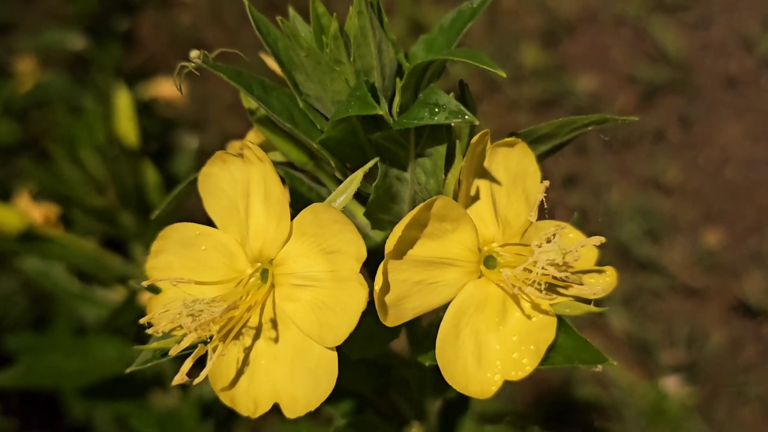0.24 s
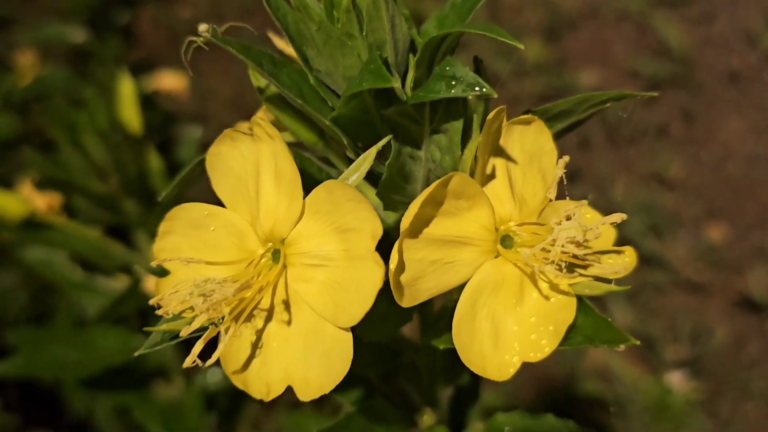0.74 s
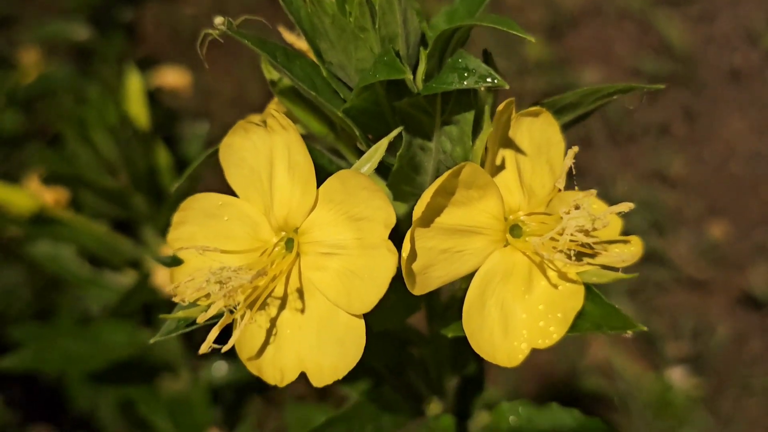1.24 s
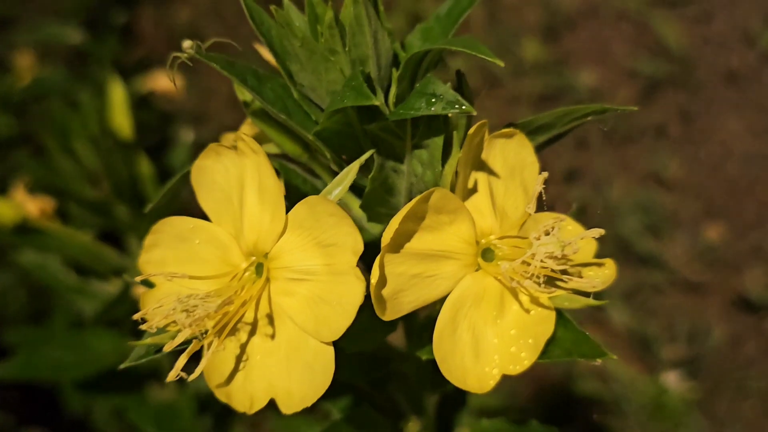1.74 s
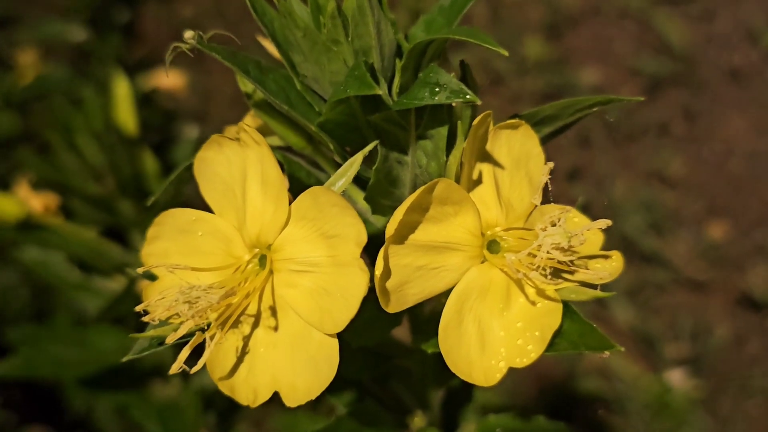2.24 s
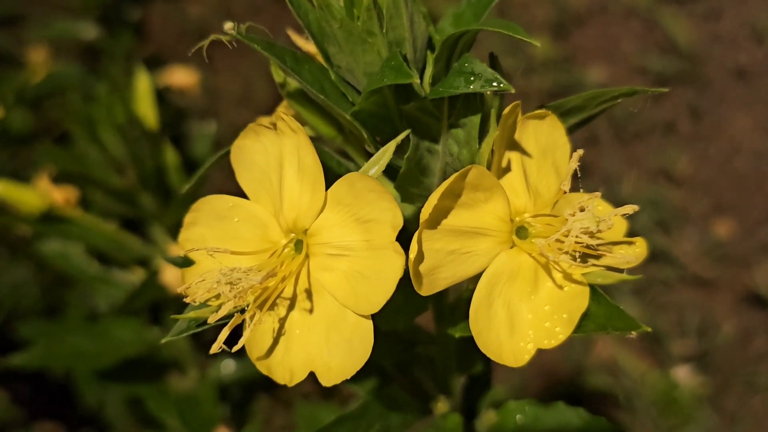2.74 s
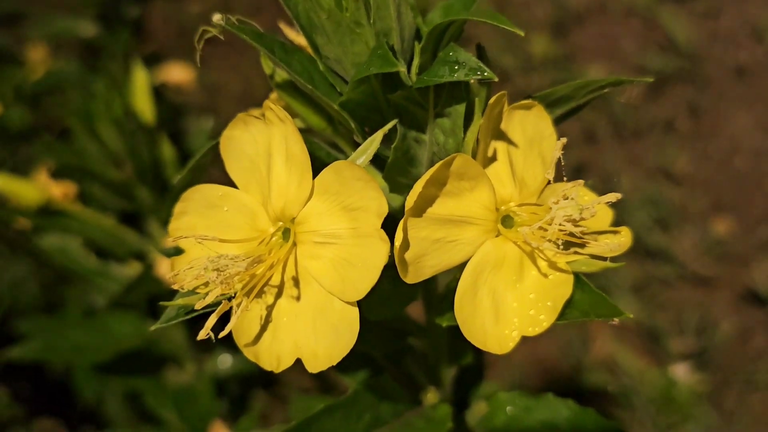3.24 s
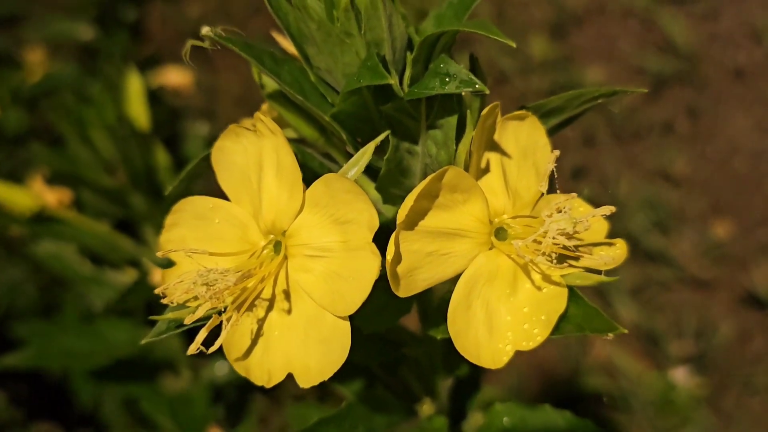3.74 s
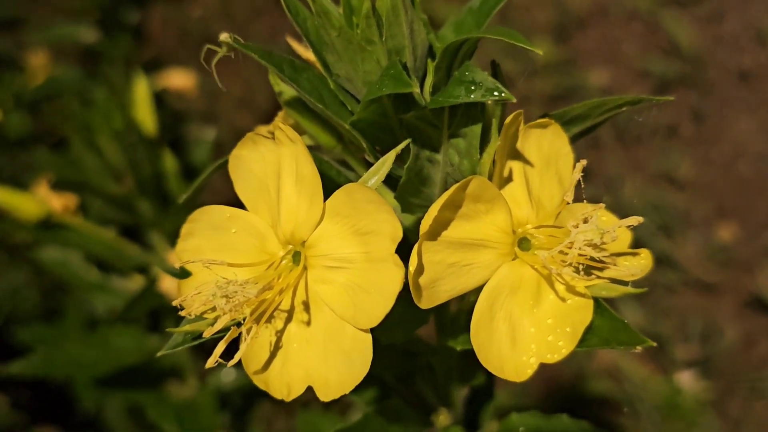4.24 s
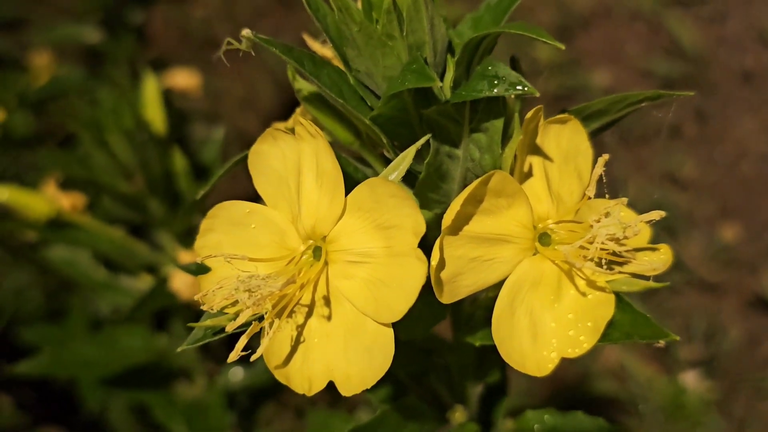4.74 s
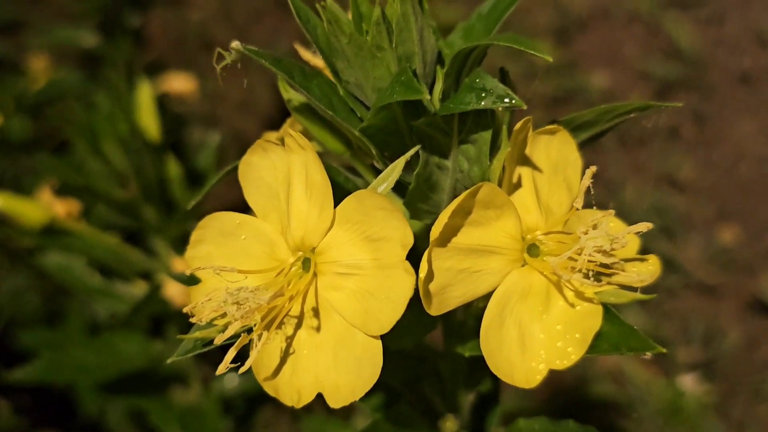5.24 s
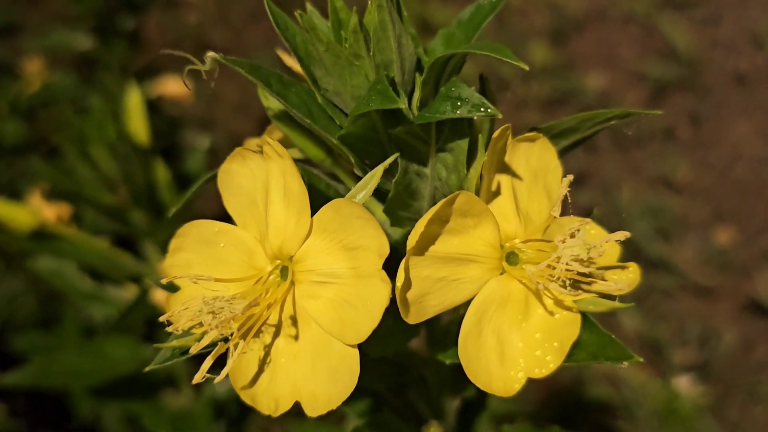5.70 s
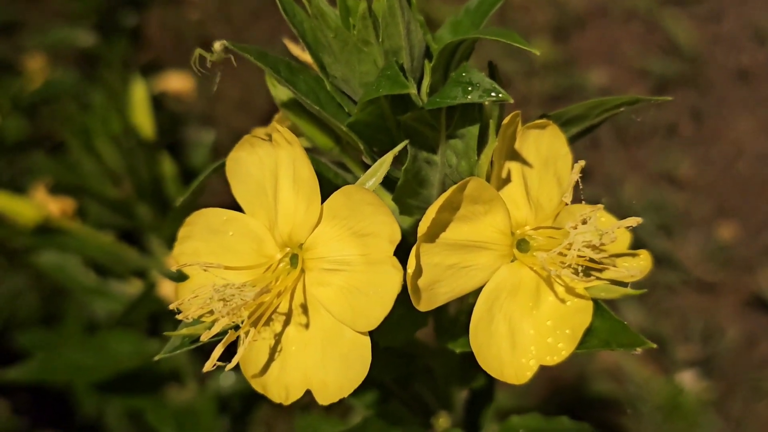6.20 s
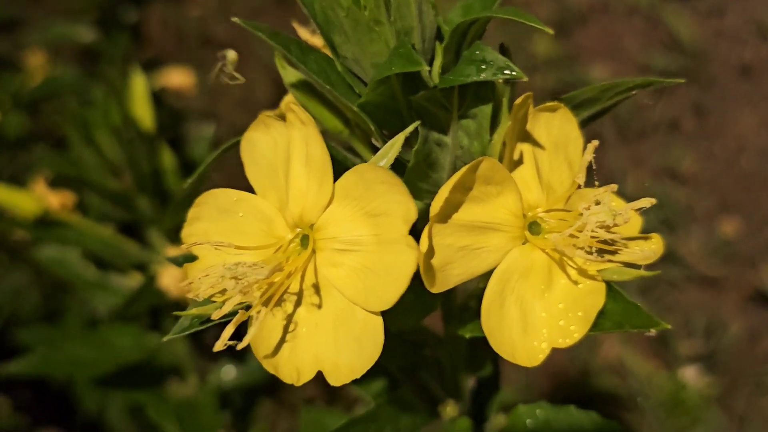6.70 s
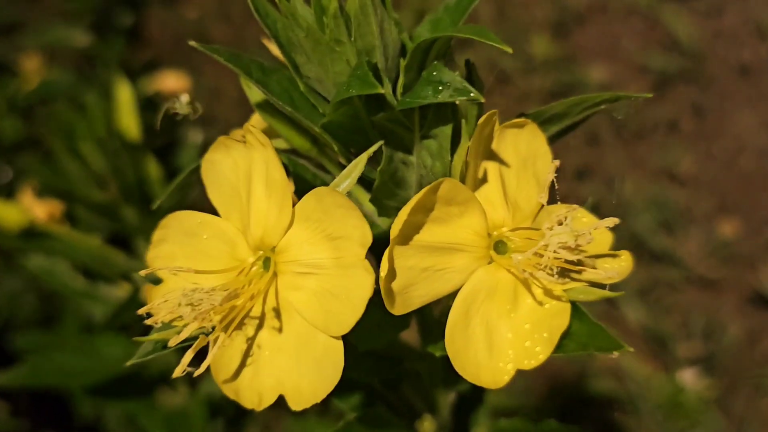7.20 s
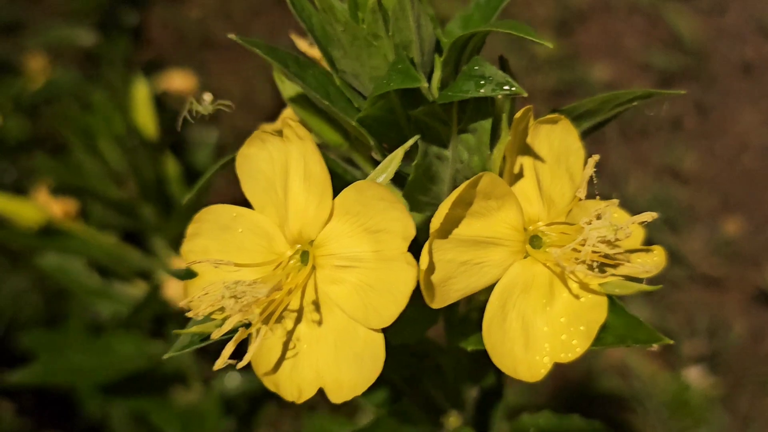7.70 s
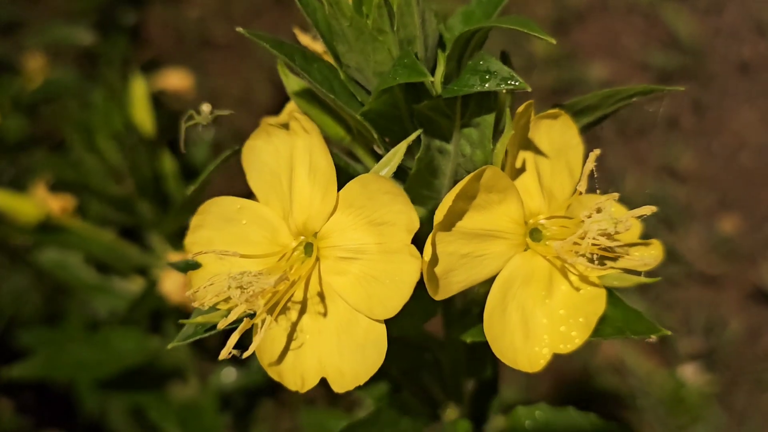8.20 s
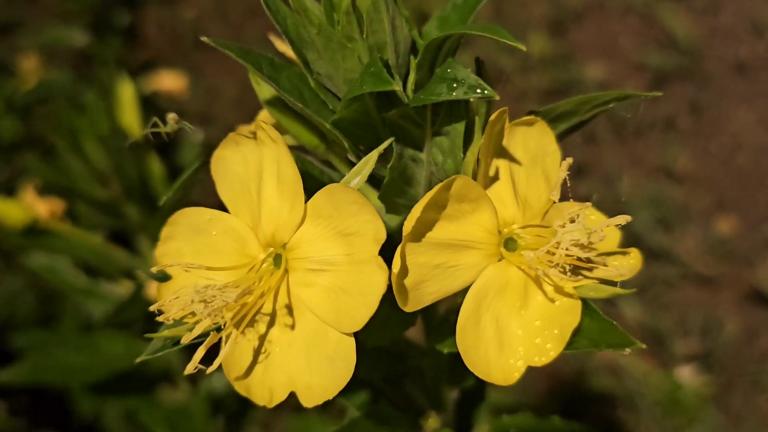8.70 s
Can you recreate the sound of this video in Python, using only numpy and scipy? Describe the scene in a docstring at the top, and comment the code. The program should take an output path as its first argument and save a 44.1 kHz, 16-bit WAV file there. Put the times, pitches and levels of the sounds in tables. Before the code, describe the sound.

Crickets trill in high, even pulses in open countryside at night, over a low distant traffic rumble and light wind.

```python
"""Open countryside at night. Distant traffic rumbles and light wind stirs the two microphone ports.
Crickets sing by stridulation: a scraper on one wing crosses a file on the other and drives a resonance.
Tree crickets trill in chorus near 3 kHz, a small cricket trills in swells, and bush crickets rasp and
buzz far above them. A few faint ticks sound in the grass, ground crickets chirp now and then,
and a low hum comes up late."""
import sys
import numpy as np
from scipy import signal
from scipy.fft import rfft, irfft, next_fast_len
from scipy.io import wavfile

SR = 44100
rng = np.random.default_rng(int(sys.argv[2]) if len(sys.argv) > 2 else 0)


def bounce(signal):
    """Save signal as a 16-bit WAV file at the path given by the first command-line argument."""
    frames = np.transpose(np.atleast_2d(signal))
    limited = np.clip(frames, -1, 1)
    pcm = np.round(limited * 32767).astype(np.int16)
    wavfile.write(sys.argv[1], SR, pcm)


N = 394694
TIME = np.arange(N) / SR


def from_db(db):
    """Amplitude ratio of a level: 20 dB to a factor of ten."""
    return 10 ** (np.asarray(db) / 20)


def rms_one(x):
    """Normalisation to unit mean power."""
    return x / np.sqrt(np.mean(x ** 2) + 1e-20)


def in_time(rows):
    """Linear interpolation of each column after t/s to every sample."""
    times, *columns = np.transpose(rows)
    return [np.interp(TIME, times, column) for column in columns]


def coloured(x, points):
    """Spectral shaping by points (f/Hz, gain/dB), joined on a logarithmic frequency axis."""
    size = next_fast_len(N)
    hz, db = np.transpose(points)
    bin_hz = np.maximum(np.fft.rfftfreq(size, 1 / SR), 1)
    gain = from_db(np.interp(np.log(bin_hz), np.log(hz), db))
    return irfft(rfft(x, size) * gain, size)[..., :N]


def band(x, low_hz, high_hz, order=2):
    """Maximally flat band-pass filtering."""
    return signal.sosfilt(signal.butter(order, [low_hz, high_hz], "band", fs=SR, output="sos"), x)


def drift(corner_hz):
    """Random modulation: low-pass noise of unit rms."""
    r = np.exp(-80 * np.pi * corner_hz / SR)   # double pole, at one step per 40 samples
    slow = signal.lfilter([1], [1, -2 * r, r * r], rng.standard_normal(N // 40 + 2002))[2000:]
    return np.interp(np.arange(N) / 40, np.arange(len(slow)), rms_one(slow))


def resonance(x, hz, width_hz):
    """A damped oscillator with unit gain at its peak."""
    r = np.exp(-np.pi * width_hz / SR)
    poles = [1, -2 * r * np.cos(2 * np.pi * hz / SR), r * r]
    return signal.lfilter([(1 - r * r) / 2, 0, (r * r - 1) / 2], poles, x + 1e-18)


def double_resonance(x, hz, width_hz):
    """Two equal resonators in cascade give steeper skirts."""
    return resonance(resonance(x, hz, width_hz), hz, width_hz)


def struck(at, level_db, hz, width_hz):
    """Impulse response of one mode to clicks at fractional sample positions."""
    clicks, at = np.zeros(N + 1), np.clip(at, 0, N - 1)
    np.add.at(clicks, at.astype(int), from_db(level_db) * (1 - at % 1))
    np.add.at(clicks, at.astype(int) + 1, from_db(level_db) * (at % 1))
    return double_resonance(clicks[:N], hz, 1.27 * width_hz)


def placed(x, side_db, lag, echo_db, echo_t60):
    """Level difference and left lag (samples) give direction; leaves and ground add diffuse scatter."""
    t = TIME[:SR // 4]
    scatter = rng.standard_normal((2, len(t))) * from_db(-60 * t / echo_t60) * (t > .002)
    scatter /= np.sqrt(np.sum(scatter ** 2, axis=1, keepdims=True))
    left = x * from_db(side_db / 2)
    right = np.interp(np.arange(N) + lag, np.arange(N), x) * from_db(-side_db / 2)
    return np.array([left, right]) + from_db(echo_db) * signal.fftconvolve(x[None], scatter)[:, :N]


def traffic(level_db=-45, right_lag=15):
    """Partial coherence: far noise from the left is alike at both ports mainly at low frequencies."""
    # Rumble spectrum: f/Hz, relative density/dB
    spectrum = [(20, -18.5), (55, 1.5), (110, -12.5), (180, -11.5), (240, -12), (330, -23.5), (500, -33.5),
                (850, -30), (1000, -30.5), (1200, -26), (2000, -36.5), (2600, -48), (3600, -51.5),
                (5000, -57), (7200, -63), (10500, -73.5), (16000, -53.5)]
    # Coherence of the ports: f/Hz, shared fraction of power
    likeness = [(30, 1), (250, 1), (500, 0.8), (1500, 0.64), (3000, 0.47), (8000, 0.0085)]
    shared, left, right = rng.standard_normal((3, N + right_lag))
    alike = [(hz, 10 * np.log10(np.clip(share, .01, .99))) for hz, share in likeness]
    apart = [(hz, 10 * np.log10(1 - np.clip(share, .01, .99))) for hz, share in likeness]
    coherent = coloured(np.array([shared[right_lag:], shared[:N]]), alike)
    diffuse = coloured(np.array([left[:N], right[:N]]), apart)
    rumble = rms_one(coloured(coherent + diffuse, spectrum))
    return from_db(level_db + 0.59 * drift(1.0)) * rumble * from_db([[.9], [-.9]])


def wind(lumps_db=2.4):
    """Turbulent pressure at the ports is lumpy low noise; in gusts the left gets more of its own."""
    # Gusts: t/s, relative level/dB, leftward bias
    gusts = [(0.0, -42.5, 3.5), (0.23, -36, 4.5), (0.54, -46, -7), (1.29, -53, 6.5), (1.46, -39, 4.5),
             (2.2, -46, 0), (2.93, -48.5, -8), (4.4, -48, -8), (5.0, -43, -4), (5.43, -51.5, -8),
             (5.78, -40.5, -3), (6.04, -45, 1), (6.24, -38.5, 2), (6.77, -41.5, 4), (6.99, -34, 6.5),
             (7.19, -43.5, 6.5), (7.54, -37.5, 9), (7.86, -42, 3), (8.94, -46, 4)]
    db, bias = in_time(gusts)
    shared, left, right = band(rng.standard_normal((3, N)), 26, 105, order=3)
    ports = np.array([shared + 0.21 * from_db(2.74 * bias) * left, shared + 0.1 * right])
    level_db = db - 5.0 + lumps_db * drift(14.0) + 0.086 * np.array([bias, -bias])
    return from_db(level_db) * ports / np.std(shared)


def trill(hz, per_s, glide, waver_db, unsteady, overtones_db=(), duty=.8, scatter_turns=0):
    """Stridulation: each wing closing drives a resonant tone that sags in pitch."""
    slip_hz, sway_db = 26, 1.2
    strokes = rng.random() + np.cumsum(per_s * (1 + unsteady * drift(4))) / SR
    progress = np.clip(strokes % 1 / duty, 0, 1)
    wing_hz = hz * (1 + glide * (.5 - progress) + .4 * unsteady * drift(15.19))
    # Each stroke starts its tone afresh, a little out of step.
    slip = np.cumsum(slip_hz * drift(3)) / SR + scatter_turns * rng.standard_normal(N)
    stroke_start = np.searchsorted(strokes, np.floor(strokes)).clip(0, N - 1)
    phase = 2 * np.pi * (np.cumsum(wing_hz) / SR + slip[stroke_start])
    tone = np.sin(phase) + sum(from_db(db) * np.sin(k * phase) for k, db in enumerate(overtones_db, 2))
    envelope = np.sin(np.pi * progress) ** 1.07
    return envelope * tone * from_db(waver_db * drift(11.6) + sway_db * drift(2.4))


def phrasing(phrases, between_db, attack_s=0.14, release_s=0.05):
    """Addition of powers: phrases swell, hold and stop short above a steady floor."""
    power = from_db(2 * between_db)
    for start, length, db in phrases:
        rise = np.clip((TIME - start) / attack_s + 0.6, 0, 1)
        fall = np.clip((start + length - TIME) / release_s + .5, 0, 1)
        power = power + (from_db(db) * rise * fall) ** 2
    return np.sqrt(power)


def tree_crickets(lead_hz=2989):
    """Superposition: behind one clear singer, close pitches beat and far ones blur to a narrow hiss."""
    # Chorus wings: f/Hz, stroke rate/Hz, relative level/dB, left-right/dB, left lag/samples
    singers = [(3016, 56.8, -8.5, 6.5, 13), (2942, 57.4, -9, -2, 13), (3016, 56.2, -8, 7, -15),
               (2942, 58, -9.5, -0.5, 1.5), (3196, 59, -15.5, 3, 9)]
    # Phrases sung together: t/s, duration/s, level/dB
    chorus_phrases = [(-.05, 0.4, -57.5), (0.503, 0.36, -59.5), (0.692, 0.25, -57), (1.02, 0.26, -60),
                      (1.344, 0.32, -56), (1.86, 0.32, -57.5), (2.42, 0.21, -57), (2.96, 0.35, -59.5),
                      (3.62, 0.25, -56.5), (3.92, 0.42, -62), (4.275, 0.23, -57.5), (4.85, 0.23, -56),
                      (5.333, 0.37, -58), (5.998, 0.28, -57), (6.56, 0.36, -57.5), (7.17, 0.29, -62.5),
                      (7.694, 0.32, -59.5), (8.27, 0.23, -58), (8.718, 0.43, -61)]
    # Phrases of the nearest singer: t/s, duration/s, level/dB
    lead_phrases = [(-.05, 0.33, -58), (0.597, 0.35, -55.5), (1.08, 0.37, -64), (1.928, 0.34, -55.5),
                    (2.626, 0.3, -55.5), (3.223, 0.35, -55), (3.915, 0.32, -56.5), (4.59, 0.28, -55.5),
                    (5.294, 0.39, -57), (5.991, 0.344, -54.5), (6.638, 0.33, -55), (7.198, 0.22, -63.5),
                    (7.757, 0.25, -63), (8.33, 0.29, -61)]
    chorus = 0
    for hz, per_s, db, side_db, lag in singers:
        song = trill(hz, per_s, glide=.08, waver_db=1.44, unsteady=.007, overtones_db=(-30, -38))
        chorus += placed(from_db(db) * song, side_db, lag, echo_db=-3.0, echo_t60=0.086)
    chorus = phrasing(chorus_phrases, between_db=-62) * chorus / np.std(chorus.mean(axis=0))
    starts = np.array(lead_phrases)[:, 0]
    since_s = np.minimum(TIME - starts[np.searchsorted(starts, TIME) - 1], .4)
    per_s = 60 - 14 * since_s   # the near singer slows through each phrase
    lead = trill(lead_hz, per_s, glide=.11, waver_db=0.6, unsteady=.003, overtones_db=(-32, -38))
    lead = phrasing(lead_phrases, between_db=-79) * rms_one(lead)
    lead = placed(lead, side_db=0, lag=1.16, echo_db=-7.0, echo_t60=0.1)
    far = rms_one(double_resonance(rng.standard_normal((2, N)), 3070, 380))
    return lead + chorus + from_db(-72) * far


def small_cricket(final_hz=6390, final_per_s=129):
    """Amplitude and frequency modulation: a fast, far trill swells, climbs, slows and stops short."""
    # Swells: start t/s, end t/s, level/dB
    swells = [(-.3, 0.313, -81), (.9, 1.447, -80), (2.15, 2.683, -80), (3.417, 3.931, -80.5),
              (4.623, 5.167, -79), (5.843, 6.45, -79), (7.103, 7.703, -76.5), (8.34, 9.011, -80)]
    ends = np.array(swells)[:, 1]
    next_end = ends[np.searchsorted(ends, TIME).clip(0, len(ends) - 1)]
    remaining_s = np.clip(next_end - TIME, 0, .6)
    song = trill(final_hz - 350 * remaining_s, final_per_s + 45 * remaining_s,
                 glide=0.11, waver_db=1.5, unsteady=.008, duty=0.62, scatter_turns=.17)
    song = placed(song, side_db=6.6, lag=-8.5, echo_db=0.5, echo_t60=.12)
    envelope = sum(from_db(db) * np.clip((TIME - start) / 0.3, 0, 1) ** 0.59
                   * np.clip((end - TIME) / 0.036, 0, 1) for start, end, db in swells)
    return envelope * song / np.std(song.mean(axis=0))


def bout_strokes(first, last, strokes, head_start, contour_db):
    """Exponential relaxation of pace: wing closings (t/s, level/dB) open quickly, then settle."""
    lead_in_s, lead_in_loss_db, end_loss_db, settle_strokes = .068, 5.5, 6, 6
    k = np.arange(round(strokes))
    ahead = head_start * (1 - np.exp(-k / settle_strokes))
    times = first + (last - first + ahead[-1]) * k / k[-1] - ahead
    db = np.interp(k / k[-1], [0, .5, 1], contour_db) - end_loss_db * np.exp((k - k[-1]) / 2)
    early = np.arange(3, 0, -1)   # three slow strokes fade in first
    times = np.r_[first - lead_in_s * early, times]
    db = np.r_[contour_db[0] - lead_in_loss_db * early, db]
    return times[times > .02], db[times > .02]


def rasp_bout(times, db, side_db, distance, teeth=20, tooth_s=.0012, reopen_s=.03):
    """Impulsive excitation: tooth clicks ring the wing, its lower modes joining late in each stroke."""
    times = np.r_[times, times + reopen_s]   # the wings scrape again, softly, as they part
    db = np.r_[db, db - 13 * (1 - .5 * distance)]
    jitter, spread = rng.normal(size=(len(times), 2, teeth + 1)).transpose(1, 0, 2)
    times, db = times + .0015 * jitter[:, -1], db + 1.8 * spread[:, -1]
    tooth = np.arange(teeth) - (teeth - 5)   # counted from the top of the swell
    at = (times[:, None] + tooth_s * tooth + .001 + .0006 * jitter[:, :-1]) * SR
    swell_db = np.where(tooth < 0, 1.6 * tooth, -2 * tooth)
    level_db = db[:, None] + 26.0 + swell_db + 2.5 * spread[:, :-1]
    # Wing modes: f/Hz, nominal width/Hz, level/dB, gain per tooth/dB
    modes = [(16160, 1400, 1.5, -1), (14300, 3260, -1.5, 1.1), (13300, 2480, 1, 1.34),
             (11360, 400, -17, 2.5), (9650, 1000, -41.5, 9)]
    wing = 0
    for k, (hz, width, mode_db, gain_db) in enumerate(modes):
        thinning_db = 7 * distance * (k > 1)   # far bouts are weaker in the lower modes
        wing += (-1) ** k * struck(at, level_db + mode_db + gain_db * tooth - thinning_db, hz, width)
    return placed(wing, side_db, lag=-.85 * side_db, echo_db=-2.5 + 6.3 * distance, echo_t60=0.032)


def bush_cricket_rasps():
    """Incoherent summation: behind the near bouts, many far rasps merge into a throbbing hiss."""
    # Bouts: first stroke t/s, last stroke t/s, strokes, head start of the quick opening/s
    bouts = [(.03, .439, 8, 0), (.659, 2.061, 24, .045), (.933, 2.645, 30, .06), (2.155, 4.033, 33, .045),
             (4.474, 6.165, 29, .05), (5.137, 6.434, 21, .075), (6.598, 8.539, 34, .065),
             (7.395, 8.934, 27, .015), (8.615, 8.909, 6, .04)]
    # The same bouts as heard: start, middle and end relative level/dB, left-right/dB, distance (0-1)
    bout_sounds = [(-69, -70, -65, 22, 0), (-68.5, -65.5, -56, 13.5, 0.07), (-62, -72, -59, -0.5, 0.8),
                   (-64.5, -64.5, -64.5, 24.5, 0), (-59.5, -62.5, -53, -1.5, 0.98),
                   (-62, -69, -68, 22.5, 0.25), (-59.5, -60.5, -52.5, 22, 0.3), (-58, -60, -67, -3.5, 1),
                   (-63, -61, -63, 19, 0.17)]
    # Strength of the far hiss: t/s, level/dB
    haze = [(0.0, -72), (0.56, -82), (0.83, -78), (2.4, -70), (2.9, -77), (3.82, -72), (4.13, -88),
            (4.3, -76), (4.56, -68.5), (5.5, -74), (6.06, -65), (6.38, -86), (6.84, -68), (7.88, -86),
            (8.47, -64), (8.65, -75), (8.94, -71)]
    # Its spectrum: f/Hz, relative density/dB
    spectrum = [(8000, -27), (10500, -21), (12000, -7), (14000, -7), (16000, -7)]
    near = sum(rasp_bout(*bout_strokes(*bout, contour_db), side_db, distance)
               for bout, (*contour_db, side_db, distance) in zip(bouts, bout_sounds))
    slow_beat, fast_beat = [np.cos(2 * np.pi * np.cumsum(per_s + 0.5 * drift(1.6)) / SR)
                            for per_s in (16.4, 33.2)]
    throb_db = in_time(haze)[0] + 2 * slow_beat + 3.5 * fast_beat + 3 * drift(30)
    hiss = rms_one(coloured(rng.standard_normal((2, N)), spectrum))
    return near + from_db(throb_db + [[2.5], [-2.5]]) * hiss


def bush_cricket_buzzes(teeth=30, teeth_hz=340):
    """Periodic excitation: a click train swells in, and the wing's ring climbs along the file."""
    # Buzzes: t/s, duration/s, relative level/dB
    buzzes = [(0.073, 0.077, -64), (0.797, 0.076, -66.5), (1.502, 0.077, -64.5), (2.274, 0.075, -64),
              (3.026, 0.074, -64), (3.784, 0.076, -65), (4.527, 0.073, -63.5), (5.258, 0.067, -62),
              (6.008, 0.073, -64), (6.827, 0.076, -63.5), (7.601, 0.079, -65), (8.329, 0.068, -65.5)]
    # Wing modes: f/Hz, nominal width/Hz, level/dB, gain over a buzz/dB
    modes = [(9060, 360, 2, -32), (9460, 410, 5.5, -12), (9730, 400, 2.5, 12), (10680, 200, 6, -7),
             (11490, 430, 6.5, -3.5)]
    start, length, db = np.array(buzzes).T[:, :, None]
    chance = rng.normal(size=(len(buzzes), teeth + 1))
    t = np.arange(teeth) / (teeth_hz * (1 + 0.0025 * chance[:, :1]))
    t = t * (1 - .035 * t)   # the clicks quicken slightly
    swell_db = -24 * np.exp(-t / .018) - 1500 * np.clip(t - length + .006, 0, 1)
    level_db = db + 35.0 + swell_db + 0.59 * chance[:, 1:]
    wing = sum(struck((start + t) * SR, level_db + mode_db + gain_db * (t / length - .5), hz, width)
               for hz, width, mode_db, gain_db in modes)
    return placed(wing, side_db=9, lag=-15, echo_db=-6, echo_t60=.08)


def grass_ticks():
    """Free decay: each lone click rings one heavily damped mode."""
    # Ticks: t/s, impulse level/dB, f/Hz, nominal width/Hz
    ticks = [(.239, -37, 5900, 2200), (4.785, -40, 11500, 1300), (5.465, -45, 9600, 900)]
    clicks = sum(struck(np.array([start * SR]), db, hz, width) for start, db, hz, width in ticks)
    return placed(clicks, side_db=5, lag=-10, echo_db=-3, echo_t60=.05)


def chirps(far_above_hz, drag_s=.014, flat_share=.032):
    """Onset and end transients: long calls start soft and drag at last; rows of t/s, level/dB, f/Hz."""
    # Ground cricket calls: first chirp t/s, last chirp t/s, chirps, level/dB, wing f/Hz
    calls = [(2.644, 2.644, 1, -52, 4350), (5.628, 6.031, 19, -57, 5210), (7.1, 7.853, 33, -55.5, 4415)]
    rows = []
    for first, last, number, db, hz in calls:
        k = np.arange(round(number))
        warming = (len(k) > 1) * np.exp(-k / 2.5)
        tiring = (len(k) > 1) * np.exp((k - k[-1]) / 3)
        times = first + (last - first - drag_s) * k / max(k[-1], 1) + drag_s * tiring
        if hz > far_above_hz:
            rows += zip(times, db - 12 * warming, np.full(len(k), hz))
        else:   # the near singer starts flat, rises past its note, settles and ends soft
            overshoot = .6 * np.exp(-((k - 5) / 2.5) ** 2)
            pitch_hz = hz * (1 - flat_share * (warming - overshoot))
            rows += zip(times, db - 6 * warming - 4 * tiring, pitch_hz)
    return rows


def ground_crickets(length_s=0.0064, glide=0.06, far_above_hz=4800):
    """Driven resonance: one stroke gives one sagging chirp, scraping when near and blurred when far."""
    tone, octave, contact, far = np.zeros((4, N))
    t = np.arange(-length_s / 2, length_s / 2, 1 / SR)
    shape = np.cos(np.pi * t / length_s) ** 1.5
    rows = chirps(far_above_hz)
    for (centre, db, hz), (bright, pitch, strength) in zip(rows, rng.normal(size=(len(rows), 3))):
        is_far = hz > far_above_hz
        wander = 1 + (.011 if is_far else .009) * pitch
        phase = 2 * np.pi * hz * wander * (t - glide * t ** 2 / length_s)
        stroke = from_db(db + strength) * shape
        start = int((centre + t[0]) * SR)
        at = slice(start, start + len(t))
        if is_far:
            far[at] += stroke * (np.sin(phase) + .6 * rng.standard_normal(len(t)) * shape ** 4)
        else:
            second_wing = .45 * np.sin((1 + .045 * bright) * phase + 2 * strength)
            tone[at] += stroke * (np.sin(phase) + second_wing)
            octave[at] += stroke * from_db(-14.5 + 3.5 * bright) * np.sin(2 * phase)
            contact[at] += stroke
    friction = band(contact * rng.standard_normal(N), 3800, 10300)
    scrape = (.45 * friction + 1.6 * resonance(friction, 4250, 1200)
              + 1.4 * resonance(friction, 9500, 1100) + 1.4 * resonance(friction, 8250, 500))
    octave = .5 * octave + from_db(3) * resonance(octave, 8720, 220)
    tone = placed(tone, side_db=12, lag=-22, echo_db=-8, echo_t60=.09)
    far = band(far, 4400, 7400)
    far = resonance(far, 5230, 900) + .4 * far   # the wing rings on
    far = from_db(-9) * placed(far, side_db=7, lag=-10, echo_db=-1, echo_t60=.13)
    treble = placed(octave + from_db(-11) * scrape, side_db=26.2, lag=-15, echo_db=10, echo_t60=0.14)
    return tone + far + treble


def hum(hz=163.3, width_hz=17):
    """Narrow-band noise is heard as a wavering low tone."""
    # Late rise of the hum: t/s, level/dB
    rise = [(0, -82), (7.75, -62.5), (7.95, -49.5), (8.95, -56)]
    return from_db(in_time(rise)[0]) * rms_one(double_resonance(rng.standard_normal(N), hz, width_hz))


def scene():
    """Linear superposition: the pressures of insects and background add at each port."""
    insects = tree_crickets() + small_cricket() + bush_cricket_rasps() + bush_cricket_buzzes()
    return insects + ground_crickets() + traffic() + hum() + wind() + grass_ticks()


def record(dry):
    """Band limiting: a steep low-pass filter cuts the highest treble."""
    cutoff_hz = 15750
    return signal.sosfilt(signal.ellip(12, .5, 70, cutoff_hz, fs=SR, output="sos"), dry)


dry = scene()
out = record(dry)
bounce(out)
```